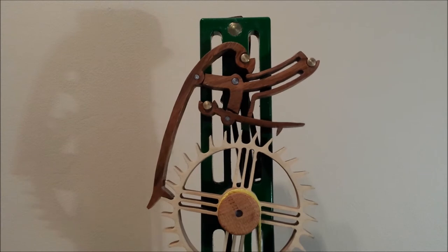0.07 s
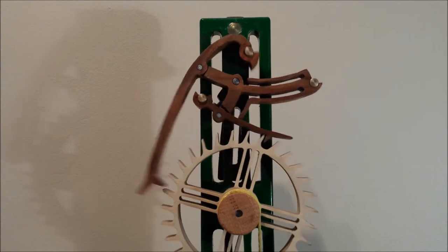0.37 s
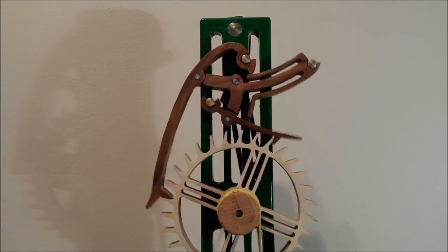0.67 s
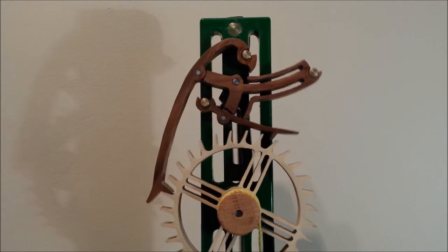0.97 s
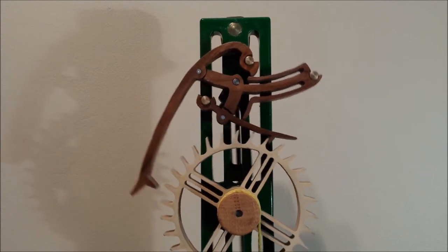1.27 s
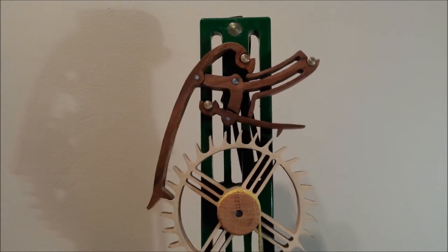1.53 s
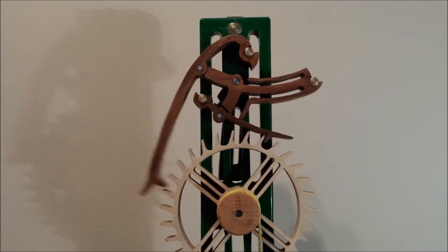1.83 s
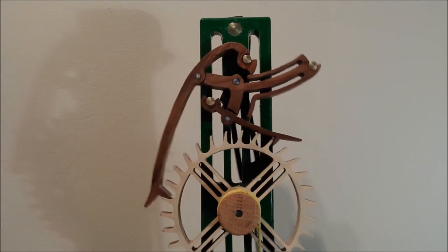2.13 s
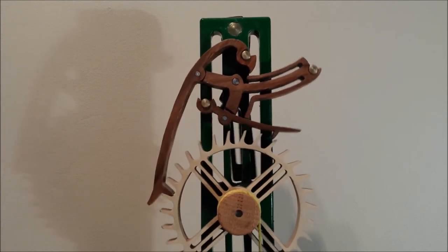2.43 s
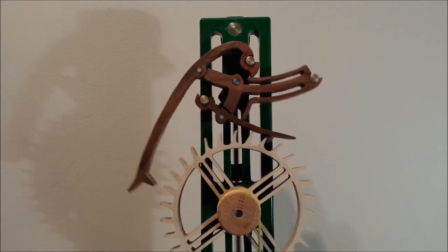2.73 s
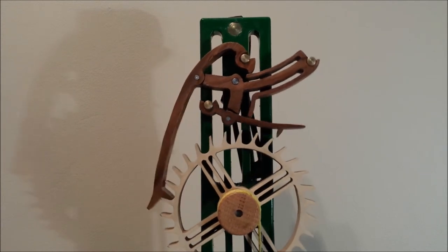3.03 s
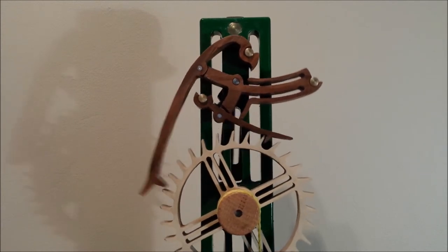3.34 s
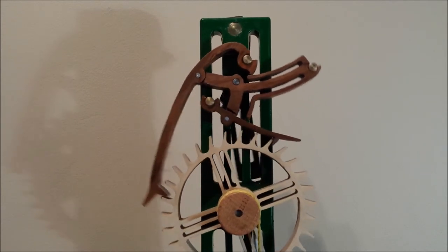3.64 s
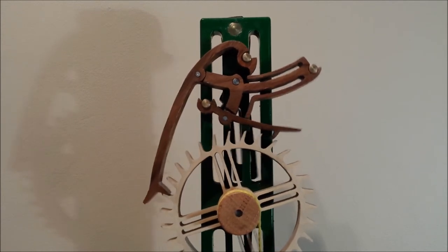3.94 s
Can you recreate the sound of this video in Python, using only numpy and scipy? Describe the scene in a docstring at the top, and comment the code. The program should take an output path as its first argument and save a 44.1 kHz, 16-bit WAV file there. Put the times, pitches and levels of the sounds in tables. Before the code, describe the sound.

A wooden clock escapement clicks from the start, slightly to the right, over the faint hush of a small room. Every 0.75 seconds the pattern repeats: a dry click, a light rebounding tick, a sharper catch and a short rattle, with soft hollow knocks and brief metallic jingles. At about 2.8 seconds one dull bump hits the right microphone. The clicking continues to the end, at about 4 seconds.

```python
"""A dry wooden click over the hush of a small quiet room: a clock escapement lets its wheel go.
Every three quarters of a second a light lever then ticks and rebounds, the pallet catches the wheel
and the arm lands with a short rattle. Each blow clicks in the wood and knocks the frame; the heavy
ones also jingle the metal fittings. The clock stands a little to the right of a stereo pair, far
enough off for the room to answer each click. Late on, one dull bump hits the right microphone."""
import sys
import numpy as np
from scipy import signal
from scipy.fft import rfft, irfft, next_fast_len
from scipy.io import wavfile
from scipy.ndimage import map_coordinates

SR = 44100
rng = np.random.default_rng(int(sys.argv[2]) if len(sys.argv) > 2 else 0)


def to_wav(s):
    """Save 16-bit WAV."""
    ch = np.atleast_2d(s).T  # columns
    pcm = np.round(np.clip(ch, -1, 1) * 32767)  # PCM
    wavfile.write(sys.argv[1], SR, pcm.astype(np.int16))


N = 176400
LIFE = np.arange(SR // 2) / SR  # time axis of one contact [s]

# colour of pallet and tooth parting or brushing: (frequency [Hz], level [dB])
RELEASE_COLOUR = [(300, -41), (1100, -4.5), (2400, -7), (3500, -1), (5200, 5), (6000, 13.5), (7700, -5),
                  (9500, -2), (10500, -13), (15500, -18)]


def amp(db):
    """Decibels to gain."""
    return 10 ** (np.asarray(db) / 20)


def unit(x):
    """Scale to rms 1."""
    return x / np.sqrt(np.mean(x ** 2) + 1e-20)


def along(points, hz):
    """Read (frequency, value) points along a log frequency axis."""
    f, v = np.transpose(points)
    return np.interp(np.log(hz + 1), np.log(f + 1), v)


def add(out, s, x):
    """Mix x in at s seconds."""
    i = max(round(s * SR), 0)
    out[:, i:i + x.shape[1]] += x[:, :max(N - i, 0)]


def noise(spectrum, size, lean=True):
    """Coloured noise of rms 1 at the two microphones; lean shifts it right, towards the clock."""
    # likeness of the two channels: (frequency [Hz], correlation [ratio])
    likeness = [(30, 0.26), (130, 0.96), (500, 0.92), (1200, 0.37), (4000, 0.25), (12000, 0.1)]
    # lift on the right and equal cut on the left: (frequency [Hz], level [dB])
    right_lift = [(100, 0.1), (1200, 0), (2400, 1.5), (5000, 0), (8000, 3), (13000, 0.5)]
    hz = np.fft.rfftfreq(size, 1 / SR)
    width = np.arccos(np.clip(along(likeness, hz), -1, 1)) / 2
    coloured = rfft(rng.standard_normal((2, size))) * amp(along(spectrum, hz))
    mid, side = coloured * [np.cos(width), np.sin(width)]
    balance = amp(np.outer([-1, 1], along(right_lift, hz)) * lean)
    return unit(irfft(np.array([mid + side, mid - side]) * balance, size))


def room(x, wet_db, build_s=0.0027):
    """x with the small room's answer, in which the bass lingers longest."""
    # reverberation: (frequency [Hz], t60 [s])
    decay_times = [(150, 0.69), (600, 0.34), (2000, 0.28), (5000, 0.21), (10000, 0.17), (15000, 0.25)]
    hz, t, bands = signal.stft(rng.standard_normal((2, len(LIFE))), SR, nperseg=256)
    decay = amp(-60 * t / along(decay_times, hz)[:, None])
    tail = signal.istft(bands * decay, SR, nperseg=256)[1][:, :len(LIFE)]
    tail *= 1 - np.exp(-LIFE / build_s)
    tail /= np.linalg.norm(tail, axis=1, keepdims=True)
    return x + amp(wet_db) * signal.fftconvolve(x, tail, axes=1)[:, :len(LIFE)]


def ring(modes, rise_s, scatter_db, spread_rad, detune=0, blur_hz=0):
    """Decaying modes, struck a little differently each time; loose parts detune and blur them."""
    hz, db, t60 = np.transpose(modes)
    gain = amp(db + scatter_db * rng.standard_normal(len(hz))) / np.linalg.norm(amp(db))
    phase = 2 * np.pi * rng.random(len(hz)) + spread_rad * rng.standard_normal((2, len(hz)))
    hz = hz * (1 + detune * rng.standard_normal(len(hz)))
    drift = np.cumsum(rng.standard_normal((len(hz), len(LIFE))), axis=1)
    drift *= np.sqrt(2 * np.pi * blur_hz / SR)
    waves = np.exp(np.outer(2j * np.pi * hz - np.log(1000) / t60, LIFE) + 1j * drift)
    ringing = ((gain * np.exp(1j * phase)) @ waves).imag
    return np.sqrt(2) * ringing * (1 - np.exp(-LIFE / rise_s))


def room_tone():
    """The faint, steady hush of the room."""
    # colour of the hush: (frequency [Hz], level [dB])
    colour = [(20, -16), (55, -1), (100, -0.5), (150, -1.5), (220, -9.5), (400, -14), (1000, -18.5),
              (3300, -19), (9000, -19.5), (15000, -20.5)]
    return amp(-69) * noise(colour, N, lean=False)


def grained(x, depth_db=4, spacing_hz=132.7):
    """Each point of contact brings out its own short wood resonances."""
    place = np.fft.rfftfreq(x.shape[1], 1 / SR) / spacing_hz
    ripple = map_coordinates(rng.standard_normal(size=400), [place], mode="mirror")
    return unit(irfft(rfft(x) * amp(depth_db * ripple), x.shape[1]))


def click(colour, t60=0.021, room_db=0, bounces=3):
    """Hard wood meets wood and chatters for a few milliseconds."""
    mean_gap_s, loss_db = .0028, 0.5  # per bounce
    gaps = mean_gap_s * (.5 + rng.random(bounces))
    age = LIFE - (np.cumsum(gaps) - gaps[0])[:, None]
    contacts = (age >= 0) * amp(-60 * abs(age) / t60 - loss_db * np.arange(bounces)[:, None])
    envelope = np.sqrt(2) * np.linalg.norm(contacts, axis=0)
    return room(envelope * grained(noise(colour, len(LIFE))), room_db)


def brush(out, s, click_db, lead_s=.0055):
    """The pallet brushes the tooth just before the main click, and far more softly."""
    add(out, s - lead_s, amp(click_db - 21.5) * click(RELEASE_COLOUR))


def knock(rise_s=0.017, t60=0.2):
    """The dense low modes of wheel and arms, and the frame's hollow ring."""
    # colour of wheel and arms: (frequency [Hz], level [dB])
    colour = [(25, -61), (70, -22), (130, 0.5), (300, -3), (560, -3), (800, -11.5), (1100, -10),
              (1700, -17.5), (3500, -16.5), (8000, -39)]
    # wooden frame: (frequency [Hz], level [dB], t60 [s])
    frame_modes = [(104, -10, 0.58), (286.8, 0.5, 0.25), (385.4, -4, 0.29), (473.3, -1, 0.23),
                   (540.8, 2, 0.19), (985, -1.5, 0.12), (1141, -8, 0.07)]
    body = noise(colour, len(LIFE)) * (1 - np.exp(-LIFE / rise_s)) * amp(-60 * LIFE / t60)
    frame = ring(frame_modes, rise_s=0.013, scatter_db=4, spread_rad=0.08)
    return 2 * room(body, wet_db=-12) + frame


def hum(hz=150.35, swell_s=0.042, t60=0.28):
    """A deep mode of the frame swells after a blow and fades, alike at both microphones."""
    envelope = (1 - np.exp(-(LIFE / swell_s) ** 2)) * amp(-60 * LIFE / t60)
    return np.pi * envelope * np.sin(2 * np.pi * hz * LIFE) * np.ones((2, 1))


def shake_frame(out, s, knock_db, hum_db, lead_s=.0055):
    """A blow's knock and hum, which start to swell just ahead of its click."""
    add(out, s - lead_s, amp(knock_db) * knock() + amp(hum_db) * hum())


def jingle(snap_db=-6.5, snap_t60=0.009):
    """The loose metal fittings snap and ring briefly, louder at the right microphone."""
    # metal fittings: (frequency [Hz], level [dB], t60 [s])
    modes = [(4340, -17, 0.12), (5680, -31, 0.18), (5920, -11.5, 0.17), (6140, -16, 0.2),
             (6730, -5.5, 0.15), (6635, -2.5, 0.1), (7010, -4, 0.19), (7960, -1, 0.098),
             (8330, -11.5, 0.14), (8360, 5, 0.083), (9560, 0, 0.13), (9920, -2.5, 0.071),
             (9710, -1.5, 0.12), (11300, -8, 0.095), (12700, -20, 0.11), (15000, -18, .08),
             (16000, -17, 0.087)]
    # bright instant of contact: (frequency [Hz], level [dB])
    snap_colour = [(3000, -22), (6500, -2.5), (9000, -5), (11500, -2), (13500, -11), (15500, 2)]
    metal = ring(modes, rise_s=0.0027, scatter_db=2.5, spread_rad=1.0, detune=.003, blur_hz=42)
    snap = amp(snap_db - 60 * LIFE / snap_t60) * noise(snap_colour, len(LIFE), lean=False)
    return room(metal + snap, wet_db=-2.5) * amp([[-4], [4]])


def heavy_blow(out, colour, s, click_db, metal_db, knock_db, hum_db):
    """A heavy contact clicks in the wood, jingles the fittings and shakes the frame."""
    add(out, s, amp(click_db) * click(colour) + amp(metal_db) * jingle())
    shake_frame(out, s, knock_db, hum_db)


def wheel_releases(out):
    """The pallet brushes a tooth and lets the wheel go."""
    # releases: (time [s], click [dB], metal [dB], knock [dB], hum [dB])
    blows = [(.063, -42.5, -43, -48.5, -51), (.821, -43, -39.5, -47.5, -47), (1.581, -42.5, -42, -50, -71),
             (2.324, -45, -40.5, -52, -50), (3.087, -43, -43, -55, -53.5), (3.846, -44.5, -44, -52, -50)]
    for s, click_db, *levels in blows:
        brush(out, s, click_db)
        heavy_blow(out, RELEASE_COLOUR, s, click_db, *levels)


def lever_ticks(out):
    """The light lever ticks and rebounds, leaving the metal still."""
    # ticks and rebounds: (time [s], click [dB], knock [dB], hum [dB])
    ticks = [(.147, -44.5, -54.5, -55), (.218, -56.5, -59.5, -63), (0.9086, -42, -50.5, -49),
             (0.972, -55.5, -56.5, -51), (1.667, -41.5, -55, -59), (1.742, -53.5, -58, -61),
             (2.408, -43.5, -53, -53), (2.478, -53.5, -64, -74), (3.178, -41.5, -56, -52),
             (3.251, -50.5, -56, -60.5), (3.936, -42, -55.5, -66)]
    # colour of a tick: (frequency [Hz], level [dB])
    colour = [(300, -18.5), (1000, -9), (1600, -6.5), (3000, -20), (3600, -1), (4600, 0), (5300, -7.5),
              (6700, -3), (8500, -11.5), (11000, -20.5), (15500, -29.5)]
    for s, click_db, knock_db, hum_db in ticks:
        add(out, s, amp(click_db) * click(colour, t60=0.014, room_db=-3, bounces=4))
        shake_frame(out, s, knock_db, hum_db)


def pallet_catches(out):
    """The pallet brushes a tooth, then strikes it and stops the wheel."""
    # catches: (time [s], click [dB], metal [dB], knock [dB], hum [dB])
    blows = [(.474, -45, -38.5, -50.5, -52.5), (1.229, -40, -32, -51.5, -48.5),
             (1.971, -38, -32.5, -49, -46), (2.730, -37, -33.5, -47.5, -49.5), (3.476, -43, -48, -61, -66),
             (3.481, -37.5, -30, -49, -44.5)]
    # colour of a catch: (frequency [Hz], level [dB])
    colour = [(300, -21), (1000, -9), (1500, -14.5), (2200, -11), (3800, -9.5), (5300, 4.5), (6500, 1),
              (7700, -8.5), (9500, -0.5), (10500, -16), (15500, -25)]
    for s, click_db, *levels in blows:
        brush(out, s, click_db)
        heavy_blow(out, colour, s, click_db, *levels)


def wheel_shifts(out):
    """The wheel shifts on its axle with a soft knock."""
    # shifts: (time [s], level [dB])
    shifts = [(.585, -60), (.748, -62), (0.863, -59), (1.625, -54), (2.366, -59), (3.13, -57.5),
              (3.885, -52.5), (3.987, -57)]
    for s, db in shifts:
        add(out, s, amp(db) * knock())


def arm_landings(out):
    """The arm lands and rattles in a quick run of blows."""
    # landings and rattles: (time [s], click [dB], metal [dB], knock [dB], hum [dB])
    blows = [(.631, -37.5, -36, -53, -47.5), (.649, -39.5, -34.5, -53, -56.5),
             (1.363, -48.5, -49, -54.5, -73), (1.372, -43, -42, -55, -48), (1.392, -49, -39, -54, -65),
             (1.421, -52.5, -59, -72, -67), (2.102, -46, -69, -54.5, -51), (2.128, -42.5, -58, -52, -49.5),
             (2.146, -46, -41, -60, -73), (2.166, -51, -66, -81, -60), (2.863, -43.5, -60, -56.5, -69),
             (2.877, -43.5, -40.5, -53, -62), (2.905, -48.5, -57, -79, -70),
             (3.614, -44.5, -58, -55.5, -45.5), (3.641, -43.5, -45, -50.5, -81)]
    # colour of a landing: (frequency [Hz], level [dB])
    colour = [(300, -28), (1000, -22.5), (2000, -14.5), (2900, -7), (3400, -11.5), (4200, -0.5),
              (6800, 2.5), (7800, -5.5), (10000, -9), (11800, -11), (13500, -23), (15500, -15)]
    for blow in blows:
        heavy_blow(out, colour, *blow)


def microphone_bump(at_s=2.8178, start_hz=354, sag_s=0.0066, rise_s=0.0016):
    """One dry, low push on the right microphone, sagging in pitch as it dies."""
    t = np.maximum(np.arange(N) / SR - at_s, 0)
    cycles = start_hz * sag_s * (1 - np.exp(-t / sag_s))
    envelope = (t / rise_s * np.exp(1 - t / rise_s)) ** 2
    return -np.sin(2 * np.pi * cycles) * envelope * amp([[-45], [-24]])


def scene():
    """The escapement and one microphone bump over the hush of the room."""
    out = room_tone()
    wheel_releases(out)
    lever_ticks(out)
    pallet_catches(out)
    wheel_shifts(out)
    arm_landings(out)
    return out + microphone_bump()


def record(dry):
    """Sound reaches the left microphone a little later; the recorder cuts the highest treble."""
    left_lag_s, top_hz = .00003, 15700
    size = next_fast_len(N + SR // 2)
    hz = np.fft.rfftfreq(size, 1 / SR)
    lag = np.exp(-1j * np.pi * left_lag_s * np.outer([1, -1], hz))
    return irfft(rfft(dry, size) * lag * (hz < top_hz), size)[:, :N]


dry = scene()
out = record(dry)
to_wav(out)
```